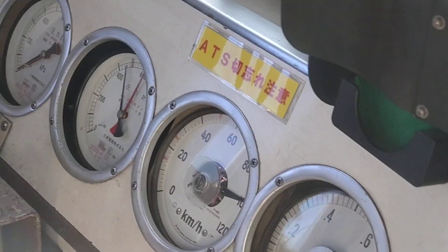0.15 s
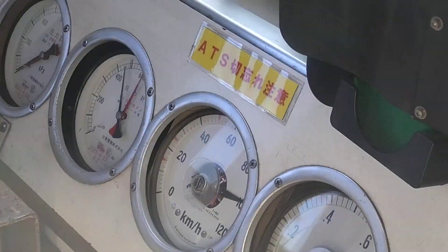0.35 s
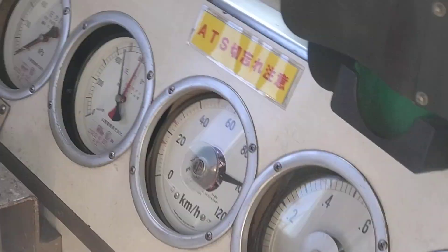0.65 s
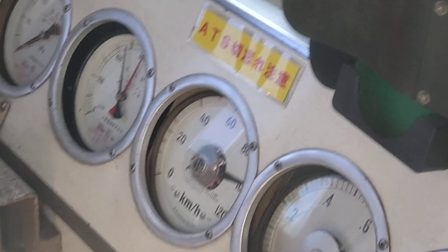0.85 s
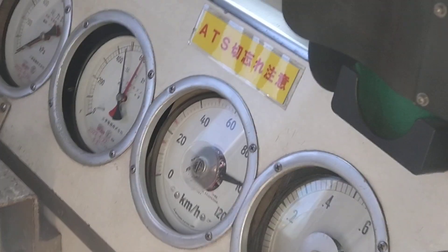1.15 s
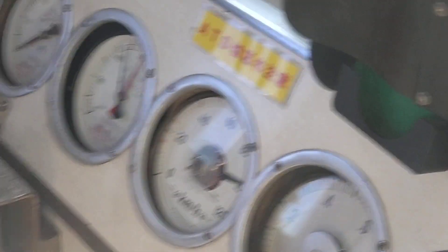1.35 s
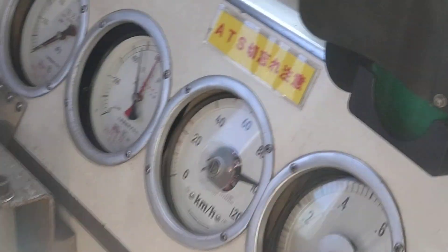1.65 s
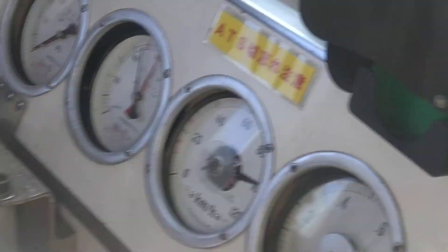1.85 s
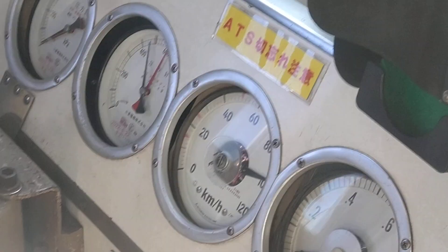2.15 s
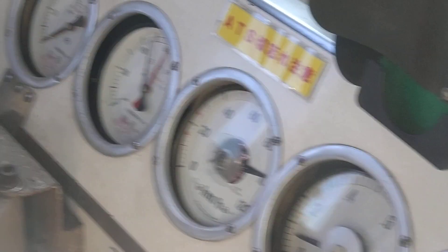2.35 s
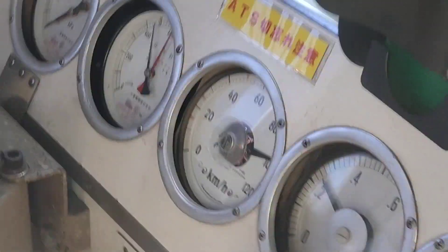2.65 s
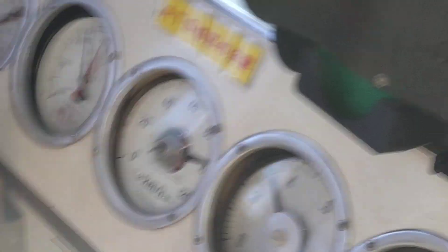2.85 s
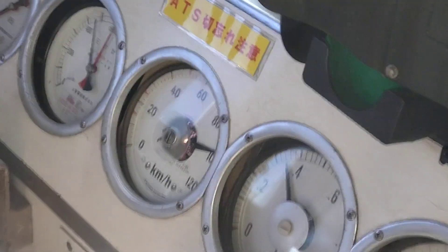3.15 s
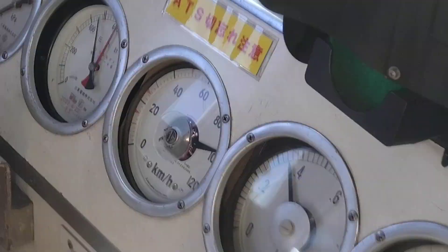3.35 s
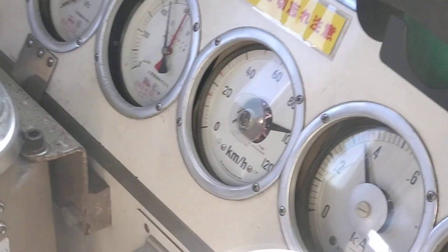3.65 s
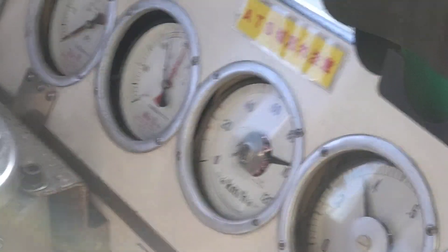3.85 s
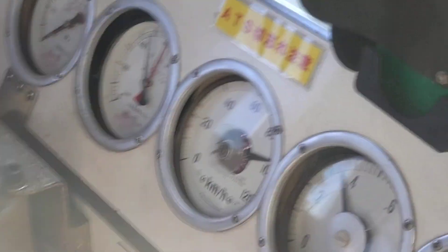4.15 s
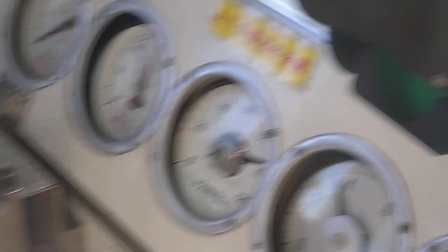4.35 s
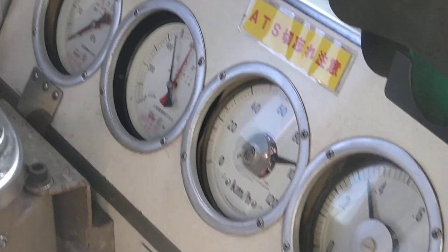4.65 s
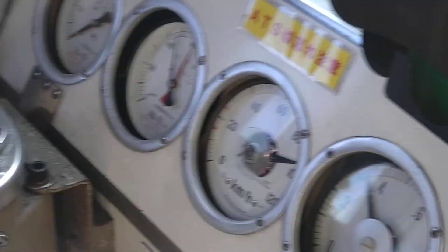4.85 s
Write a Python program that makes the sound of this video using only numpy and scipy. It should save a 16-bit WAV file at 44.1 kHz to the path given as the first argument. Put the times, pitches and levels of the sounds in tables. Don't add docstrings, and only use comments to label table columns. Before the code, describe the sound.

Inside a fast electric train cab, low wheel roar and a slowly sinking gear whine run under irregular track thumps, metal clanks and handling clicks.

```python
import sys
import numpy as np
from scipy import signal
from scipy.fft import rfft, irfft
from scipy.io import wavfile
from scipy.ndimage import uniform_filter1d

SR = 44100
rng = np.random.default_rng(int(sys.argv[2]) if len(sys.argv) > 2 else 0)


def file_out(sig):
    cols = np.atleast_2d(sig).T
    lim = np.clip(cols, -1, 1)
    pcm = np.round(lim * 32767).astype(np.int16)
    wavfile.write(sys.argv[1], SR, pcm)


def amplitude_ratio(level_db):
    exponent = np.asarray(level_db, float) / 20
    return 10 ** exponent


N = 221249


def evened(x):
    return x / np.sqrt(np.mean(x ** 2) + 1e-20)


def read(points, hz):
    f, value = np.transpose(points)
    return np.interp(np.log(hz + 1), np.log(f + 1), value)


def along(rows, t):
    s, *columns = np.transpose(rows)
    return [np.interp(t, s, c) for c in columns]


def swing(rows, t):
    db, = along(rows, t)
    return db - db.mean()


def add(mix, s, sound):
    part = mix[..., round(s * SR):][..., :sound.shape[-1]]
    part += sound[..., :part.shape[-1]]


def resonate(x, hz, width_hz):
    turn = np.exp(2j * np.pi * np.cumsum(hz * np.ones(x.shape[-1])) / SR)
    r = np.exp(-np.pi * width_hz / SR)
    return 2 * (turn * signal.lfilter([1 - r], [1, -r], x / turn)).real


def resonate_twice(x, hz, width_hz):
    return resonate(resonate(x, hz, width_hz), hz, width_hz)


def smooth_twice(x, size, axes=(-1, -1)):
    return uniform_filter1d(uniform_filter1d(x, size, axes[0]), size, axes[1])


def tinted(x, points, tilt_db=0):
    hz = np.fft.rfftfreq(x.shape[-1], 1 / SR)
    return irfft(rfft(x) * amplitude_ratio(read(points, hz) + tilt_db * np.log2((hz + 500) / 6000)), x.shape[-1])


def sides(pan_db):
    return amplitude_ratio(np.array([[pan_db / 2], [-pan_db / 2]]))


def fade_out(t):
    return np.cos(t / t[-1] * np.pi / 2)


# frequency in Hz, level in dB per Hz.
ROAR_COLOUR = [(13, -57), (22, -53), (46, -27), (62, -7), (76, -5), (168, -9.5), (246, -3.5), (545, -8.5),
               (801, -10.5), (1050, -14.5), (4150, -27.5), (4900, -33), (7590, -39.5), (8950, -46.5),
               (10600, -51), (13900, -46), (15500, -73)]
# frequency in Hz, width in Hz, lift in dB.
CAB_HOLLOWS = [(78, 49, 3), (244, 18, 7), (366.5, 27, 6.5), (480, 30, 2), (671.7, 29, 8), (826, 22, 2.5),
               (1376, 250, -2.5), (3830, 1400, -1), (9360, 330, 5), (15500, 900, 19)]
LAYER_SPLIT_HZ = (155, 880, 4160)
# frequency in Hz, likeness 0-1.
LIKENESS = [(30, .9995), (60, .998), (90, .996), (130, .945), (200, .955), (300, .982), (600, .9),
            (850, .75), (1150, .5), (1500, .45), (2200, .3), (4000, .35), (15000, .3)]
# frequency in Hz, level in dB.
BALANCE = [(20, 2), (60, -1.5), (300, -0.7), (700, 0), (1300, 4), (2400, 2), (4400, 2.5), (7500, -6),
           (8600, 17.5), (10200, 7), (11200, -2.5), (15000, 2.5)]
# frequency in Hz, phase in radians.
PORT_LEAD = [(300, 0), (850, .3), (1150, 1.5), (1500, 1.9), (2200, 1.5), (15000, 1.57)]
# time in seconds, level in dB.
BODY_SWAY = [(0, -26), (.42, -28), (.71, -18), (.91, -31), (1.05, -27.5), (1.6, -31), (1.77, -22.5),
             (1.98, -47), (2.25, -38), (2.6, -40.5), (2.74, -25.5), (3.05, -29.5), (3.56, -40.5),
             (3.8, -31), (3.97, -34.5), (4.44, -25.5), (4.76, -32), (5.02, -35)]
# time in seconds, level in dB.
ROUGHNESS = [(0, -11.5), (.4, -12.5), (.78, -12.5), (.95, -15.5), (1.2, -15.5), (1.34, -17.5), (1.87, -21),
             (1.98, -13.5), (2.15, -27.5), (2.25, -21.5), (2.6, -26), (2.91, -17.5), (3.08, -21),
             (3.48, -24.5), (4.18, -17.5), (4.44, -18.5), (4.8, -21), (5.02, -17)]
ROUGHNESS_SHARE = (0.87, 0.88, 0.65)


def rolling(patchy_db=1.9, flicker_db=0.6, bass_patchy=0.45):
    frames, hz = N // 256 + 5, np.fft.rfftfreq(1024, 1 / SR)
    t = np.arange(frames) * 256 / SR
    a, b, c, d, patches = rng.standard_normal((frames, 513, 5)).T
    patches = evened(smooth_twice(patches, 10, (0, 1)))
    flicker = evened(uniform_filter1d(rng.standard_normal(frames), 5))

    layers_db = [swing(BODY_SWAY, t)] + [share * swing(ROUGHNESS, t) for share in ROUGHNESS_SHARE]
    above = [np.ones(513)]
    above += [1 / (1 + (f / (hz + 1)) ** 6) for f in LAYER_SPLIT_HZ]
    above += [np.zeros(513)]
    swell_db = sum((above[k] - above[k + 1])[:, None] * db for k, db in enumerate(layers_db))
    colour_db = read(ROAR_COLOUR, hz)
    colour_db = colour_db + sum(db / (1 + (2 * (hz - f) / w) ** 2) for f, w, db in CAB_HOLLOWS)

    treble = above[2][:, None]
    patch_db = patchy_db * (bass_patchy + (1 - bass_patchy) * treble) * patches
    gain_db = colour_db[:, None] + swell_db + patch_db + flicker_db * flicker * treble
    half_lean_db = read(BALANCE, hz)[:, None] / 2

    same = read(LIKENESS, hz)[:, None]
    left = a + 1j * b
    right = same * left * np.exp(-1j * read(PORT_LEAD, hz))[:, None] + np.sqrt(1 - same ** 2) * (c + 1j * d)
    z = np.array([left * amplitude_ratio(gain_db + half_lean_db), right * amplitude_ratio(gain_db - half_lean_db)])
    return amplitude_ratio(-20) * evened(signal.istft(z, nperseg=1024, noverlap=768)[1][:, :N])


# time in seconds, frequency in Hz.
GEAR_MESH = [(0, 827), (1, 823), (2, 819), (2.5, 815), (3, 810), (3.5, 802), (4, 795), (4.5, 788),
             (5.02, 782)]
TONE_ORDERS = (1, .9755, 2, 1.951, 1.117, 3, 2.927, 1.038)
# time in seconds, near motor in dB, far motor in dB, second orders in dB.
TOOTH_LOAD = [(0, -37, -38, -46), (.3, -33, -36, -40), (.75, -35, -32, -41), (1.1, -41, -37, -43),
              (1.3, -38, -39, -49), (1.5, -36, -37, -44), (1.75, -37, -34, -43.5), (2.02, -37, -38, -42.5),
              (2.15, -46, -50, -57), (2.75, -38, -40, -55), (3, -35, -44, -51), (3.3, -40, -44, -50),
              (3.6, -41, -46, -49), (3.8, -36, -45, -48), (4.2, -33, -40, -52), (4.5, -35, -44, -52),
              (5.02, -35, -40, -50)]
FAR_SECOND_DB, THIRD_DB, WOBBLE_DB = -7, -8.5, .8
SIDE_DB, SIDE_FROM_S, SIDE_WAKE_DB = -58, 3.22, 14
STRAND_DB, STRAND_FROM_S = -36.5, 4.42


def gears(waver_hz=14.0, low_purity=.64, high_purity=.82):
    t = np.arange(N) / SR
    mesh_hz, = along(GEAR_MESH, t)
    near, far, second = along(TOOTH_LOAD, t)
    far_second = second + FAR_SECOND_DB
    side = SIDE_DB + SIDE_WAKE_DB / (1 + np.exp((SIDE_FROM_S - t) / 0.04))
    strand = STRAND_DB - 20 / (1 + np.exp((t - STRAND_FROM_S) / 0.023))
    levels_db = [near, far, second, far_second, side, second + THIRD_DB, far_second + THIRD_DB, strand]
    out = np.zeros((2, N))
    for multiple, db in zip(TONE_ORDERS, levels_db):
        hz = multiple * mesh_hz
        apart = np.clip(multiple - .8, 0, 1)
        purity = low_purity + (high_purity - low_purity) * apart
        turns = np.cumsum(hz) / SR + rng.random() + apart * rng.random((2, 1))
        tone = np.sqrt(2) * np.sin(2 * np.pi * turns)
        rough = (1 - apart) * rng.standard_normal(N) + apart * rng.standard_normal((2, N))
        fuzz = evened(resonate_twice(rough, hz, 2 * waver_hz))
        wobble = evened(smooth_twice(rng.standard_normal(N), 2500))
        out += amplitude_ratio(db + WOBBLE_DB * wobble) * (purity * tone + (1 - purity) * fuzz)
    return amplitude_ratio(6.3) * out


# start in seconds, peak in dB, floor ring in Hz, rebound in dB, rebound delay in seconds.
RAIL_JOINTS = [(1.935, -3.5, 288, -19, .03), (1.945, -2.5, 270, -3, 0.019), (1.974, -4.5, 330, -10, .014),
               (2.008, 4.5, 269.5, -2.5, .017), (2.196, 0.5, 273, -8, .013), (2.284, -5, 264.4, -1, 0.025),
               (2.878, -4, 228.7, -8.5, 0.037), (2.888, -2.5, 257, -11.5, .016),
               (2.92, -12, 216, -12, .015), (2.949, 2.5, 275.7, -8, 0.018), (2.98, -6.5, 269, -11, 0.021),
               (3.139, -5, 200, -2.5, .011), (3.171, -14, 286, -2, .015), (3.227, -6.5, 217, -10.5, .016)]
# start in seconds, peak in dB, floor ring in Hz, rebound in dB.
SWITCH_BLOWS = [(.195, -22, 293, -9), (.578, -13, 232, -3), (2.613, -21, 426, -18), (2.649, -15.5, 254, -5),
                (2.749, -21, 368, 6), (3.572, -20.5, 283, -5), (4.262, -4, 256.5, -3.5),
                (4.85, -20, 387, -21), (.008, -8.5, 260, -9), (.479, -3, 243, -9.5),
                (4.652, -9.5, 297, -10), (0.673, -15, 258, 1), (0.706, -11, 320, -11),
                (0.744, -6, 363, -28), (.801, -1, 286, -22), (.846, -2.5, 330, -20), (.946, -2.5, 283, -19),
                (.985, -4.5, 352, -23), (1.012, 2.5, 254, -8), (1.186, -0.5, 250.4, -3),
                (1.23, -5.5, 270, -3.5), (1.379, -7.5, 220, 3), (1.398, -4, 228, -11.5),
                (1.46, -5.5, 252.4, -5), (1.622, -11, 283, -27), (1.758, -13, 381, -17),
                (3.706, -14.5, 247, -18), (3.852, -10, 263, -36), (3.968, -6.5, 343, -13),
                (4.029, -6, 331, -24), (4.039, -6.5, 325, -10), (4.054, -3, 254, -1.5), (4.221, 1, 329, -7),
                (4.231, -2, 261, -19), (4.245, 1, 248, -7), (4.272, -9.5, 277, -14), (4.951, -7, 277, -7)]
# start in seconds, peak in dB, floor ring in Hz, rebound in dB.
STEEL_SLAPS = [(0.408, -9, 418, -18), (2.299, -32, 268, -10), (2.599, -31, 400, -20),
               (2.996, -50, 280, -12), (4.55, -11.5, 289, -6), (0.324, -16, 241, 7.5),
               (0.718, -0.5, 338, -4), (1.955, -13, 290, -5), (4.419, -46, 248, -11),
               (4.6383, -0.5, 264.4, -9), (4.666, -7.5, 353, -2.5), (4.69, -13, 312, -3.5),
               (4.713, -11, 310, -26), (4.927, -23.5, 314, -5)]
JOINT_RING, POINT_RING = 0.7, 0.49
JOINT_CRACK_DB, POINT_CRACK_DB, SLAP_CRACK_DB = -11, -12.5, 3
CRACK_FOLLOW = .5
REBOUND_S, REBOUND_HZ, SECOND_REBOUND_DB, REBOUND_CRACK_DB = .019, 283, -12.5, -5


def blows():
    first = [(*row, JOINT_CRACK_DB, JOINT_RING) for row in RAIL_JOINTS]
    first += [(*row, REBOUND_S, POINT_CRACK_DB, POINT_RING) for row in SWITCH_BLOWS]
    first += [(*row, REBOUND_S, SLAP_CRACK_DB, POINT_RING) for row in STEEL_SLAPS]
    out = []
    for s, db, hz, back_db, late_s, crack_db, ring_factor in first:
        crack_db = crack_db + CRACK_FOLLOW * db
        back_crack_db = crack_db + back_db + REBOUND_CRACK_DB
        out.append((s, db, hz, crack_db, ring_factor))
        out.append((s + late_s, db + back_db, REBOUND_HZ, back_crack_db, JOINT_RING))
        out.append((s + 2 * late_s, db + back_db + SECOND_REBOUND_DB, REBOUND_HZ,
                    back_crack_db + REBOUND_CRACK_DB, JOINT_RING))
    return out


# ratio to the ring, level in dB, t60 in seconds.
PANEL_MODES = [(0.975, 6, 0.13), (1.094, 4, 0.075), (1.44, -6, 0.19), (1.788, 3.5, 0.049),
               (0.657, -1, 0.034), (0.341, -9.5, 0.11)]


def joints():
    t, out = np.arange(6144) / SR, np.zeros((2, N))
    for s, db, hz, crack_db, ring_factor in blows():
        ring = np.zeros(len(t))
        for ratio, mode_db, t60 in PANEL_MODES:
            decay = amplitude_ratio(mode_db - 60 * t / (t60 * ring_factor))
            ring += decay * np.sin(2 * np.pi * (ratio * hz * t + 0.15 * rng.random()))
        ring *= (1 - np.exp(-t / 0.0046)) ** 2
        noise = rng.standard_normal(len(t)) + .5 * rng.standard_normal((2, len(t)))
        crack = evened(resonate(resonate(noise, 1290, 2500), 825, 300))
        crack *= amplitude_ratio(-60 * t / 0.21) * (1 - np.exp(-t / 0.0013))
        add(out, s - .004, amplitude_ratio(db - 3.5) * ring / abs(ring).max() + amplitude_ratio(crack_db - 20) * crack)
    return signal.sosfilt(signal.butter(2, 55, "high", fs=SR, output="sos"), out)


# start in seconds, peak in dB, left minus right in dB, rattle t60 in seconds.
FITTING_CLANKS = [(0.4875, -20, -5, 0.31), (0.9855, -31.5, 34, 0.36), (1.3, -20, 5.5, 0.9),
                  (1.465, -19, 3.5, 1), (1.96, -43, 0, 0.57), (2.017, -27, 6, 0.09), (2.105, -22, 1, 1),
                  (3.1043, -23, 7, 1), (4.04, -23, 10.5, 0.44), (4.229, -24.5, 19, 0.55),
                  (4.3, -31, 8, 0.075), (4.647, -36, -19, 0.21), (4.7084, -18, -5, 0.16),
                  (4.791, -21, 0, 0.43), (4.968, -23.5, 9, 0.38)]
# start in seconds, peak in dB, left minus right in dB, rattle t60 in seconds,
# brightness in dB an octave.
FITTING_KNOCKS = [(3.4328, -7.5, 4, .22, -.5), (3.4405, -11, 4, .15, -2), (3.4555, -13, 4, .2, -2),
                  (3.476, -18, 4, .4, -1), (3.6754, -18.5, 1, .35, -2.5), (3.695, -18, 1, .4, -1.5),
                  (4.552, -18, -3, .3, -6), (4.5654, -17, 4, .4, -6), (4.6385, -15.5, 2, .3, -.5),
                  (4.647, -14, 2, .3, -.5), (4.659, -12, 5, .3, -1), (4.668, -13, 3, .3, -1),
                  (4.69, -16, 2, .4, -.5), (4.7385, -17, 1, .3, -1.5)]
# frequency in Hz, level in dB per Hz.
SHEET_COLOUR = [(150, -75), (530, -33), (900, -12), (1500, -4), (2150, -4), (3100, -4), (3870, -4),
                (4570, -6), (5500, -11), (7400, -20), (9370, -23), (15000, -32)]
# frequency in Hz, width in Hz, level in dB.
SHEET_RINGS = [(3900, 280, 2), (2250, 600, -14), (4900, 350, -14)]
RING_FOLLOW = 1.1
DULL_FOLLOW = .2


def clanks():
    t, out = np.arange(12288) / SR, np.zeros((2, N))
    rows = [(*row, DULL_FOLLOW * (row[1] + 10)) for row in FITTING_CLANKS]
    for s, db, pan_db, t60, tilt_db in rows + FITTING_KNOCKS:
        grains = amplitude_ratio(1.2 * np.minimum(rng.exponential(1, len(t) // 64), 4)).repeat(64)
        spot = rng.uniform(.97, 1.04)
        rattle = evened(tinted(rng.standard_normal((2, len(t))) * grains, SHEET_COLOUR, tilt_db))
        rings = sum(amplitude_ratio(d) * evened(resonate_twice(rattle, f * spot, w)) for f, w, d in SHEET_RINGS)
        shape = amplitude_ratio(-60 * t / t60) + .8 * amplitude_ratio(-60 * t / .035)
        shape *= (1 - np.exp(-t / .0006)) * fade_out(t)
        add(out, s, amplitude_ratio(db - 11) * sides(pan_db) * (rattle + amplitude_ratio(RING_FOLLOW * db) * rings) * shape)
    return out


# start in seconds, peak in dB, left minus right in dB, brightness in dB an octave.
CASING_TICKS = [(0.196, -24.5, -25, -2.5), (0.497, -19.5, 3, 14), (1.1693, -19, 5, 0), (1.251, -32, -10, 7),
                (1.758, -28, 2, 5), (2.538, -31, -12, 1), (2.6517, -22, -1.5, 4), (2.829, -26.5, -8, 8),
                (2.927, -23.5, -3, 4), (3.0365, -14, 3, 2), (3.211, -27.5, 12, 9), (3.9688, -35, 1, -2),
                (4.0414, -30, 3, 3), (4.217, -22, -12, 10), (4.2504, -22, -13, 4.5),
                (4.3052, -21.5, -4, 16), (4.379, -21.5, -5, 6), (4.6366, -33, 21, -11)]
# start in seconds, peak in dB, left minus right in dB.
CASING_SNAPS = [
    (2.813, -17, -3),
    (2.8669, -10, -5),
    (2.929, -18, -1),
    (2.6532, -16, 2),
    (2.986, -19, 2),
    (3.2005, -20, 3),
    (3.311, -14, -3),
    (4.1945, -5, -1),
]
# start in seconds, peak in dB, left minus right in dB,
# brightness in dB an octave, t60 in seconds.
HAND_RUBS = [
    (.18, -24, 1, 3, 0.39),
    (3.95, -19.5, -2.5, -1, 0.98),
    (4.2, -22.5, 4, 3, 0.42),
    (4.27, -31, -4, 7, .5),
    (4.39, -23.5, -3, 6, .6),
]
# frequency in Hz, level in dB.
CASING_COLOUR = [(600, -76), (1500, 13.5), (2500, 4.5), (5000, -4.5), (6000, 1), (7500, -8), (9000, 0.5),
                 (10500, -11.5), (13000, -5.5), (15500, -23)]
TICK_T60_S, SNAP_T60_S, SNAP_TILT_DB = .11, .012, -1.5


def ticks():
    t, out = np.arange(8192) / SR, np.zeros((2, N))
    rows = [(*row, TICK_T60_S) for row in CASING_TICKS]
    rows += [(*row, SNAP_TILT_DB, SNAP_T60_S) for row in CASING_SNAPS]
    for s, db, pan_db, tilt_db, t60 in rows + HAND_RUBS:
        burst = evened(tinted(rng.standard_normal((2, len(t))), CASING_COLOUR, np.clip(tilt_db, -6, 8)))
        shape = amplitude_ratio(-60 * t / t60) * (1 - np.exp(-45 * t / t60)) * fade_out(t)
        add(out, s, amplitude_ratio(db - 9) * sides(pan_db) * burst * shape)
    return out


# start in seconds, length in seconds, frequency in Hz, level in dB.
FLOOR_HUMS = [(0.07, 0.075, 88, -22), (0.17, 0.17, 65, -26.5), (0.12, 0.15, 338, -23.5),
              (0.29, 0.33, 273, -25.5), (0.36, 0.12, 380, -27), (0.599, 0.13, 89, -19),
              (1.618, 0.19, 275, -26.5), (1.6, 0.32, 310, -27), (2.5, 0.13, 280, -26),
              (.08, 0.15, 430, -24), (.39, 0.055, 560, -24), (0.57, .07, 510, -24), (4.02, .2, 810, -25.5),
              (2.86, 0.2, 202, -21), (3.7, 0.041, 3420, -38), (0.704, 0.12, 590, -22),
              (0.96, 0.059, 700, -23), (3.799, 0.12, 275, -24), (4.005, 0.39, 300, -27)]
HUM_WIDTH_HZ, HUM_WIDTH_SHARE = 16, 0.041


def hums():
    t, out = np.arange(0, .8, 1 / SR), np.zeros(N)
    for s, length_s, hz, db in FLOOR_HUMS:
        width_hz = HUM_WIDTH_HZ + HUM_WIDTH_SHARE * hz
        note = evened(resonate_twice(rng.standard_normal(len(t)), hz, width_hz))
        swell = np.sqrt(np.sin(np.pi * np.clip(t / length_s, 0, 1)).clip(0))
        add(out, s, amplitude_ratio(db) * note * swell)
    return out


def scene():
    return rolling() + gears() + joints() + clanks() + ticks() + hums()


# frequency in Hz, level in dB.
THRESHOLD = [(300, -70), (900, -11.5), (1500, -5.5), (3000, -4), (5000, 0.5), (9000, -1), (13000, 2.5),
             (15000, 1.5)]
# start in seconds, end in seconds, loss in dB.
TREBLE_SHORT = [
    (0, 1.07, 3),
    (1.41, 1.52, 2),
    (1.75, 2.03, 7),
    (2.43, 3.13, 6),
    (3.377, 4.8, 18),
]
# frequency in Hz, share 0-1.
LOSS_SHARE = [(6300, 0.05), (7300, 1), (10300, 1), (11000, 0.4), (12300, 0.4), (13000, 0.3)]
SPARED_ATTACKS = [
    2.8669,
    3.311,
    3.4328,
    4.1945,
    4.6385,
]
SPARE_BEFORE_S, SPARE_AFTER_S = .03, .012


def thinned(x, depth_db=-30.0, uneven_db=4.5):
    frame = dict(window="cosine", nperseg=1536, noverlap=1024)
    hz, t, z = signal.stft(x, SR, **frame)
    power = uniform_filter1d(uniform_filter1d(abs(z) ** 2, size=3, axis=1), size=2, axis=2)
    line_db = 10 * np.log10(abs(power) + 1e-16)
    jumps = rng.standard_normal((len(hz) // 5 + 1, len(t) // 3 + 1)).repeat(5, 0).repeat(3, 1)
    gate_db = uniform_filter1d(line_db, size=41, axis=1) + read(THRESHOLD, hz)[:, None]
    gate_db = gate_db + uneven_db * jumps[:len(hz), :len(t)]

    lost_db = uniform_filter1d(sum(db * (t >= a) * (t < b) for a, b, db in TREBLE_SHORT) * 1., size=7)
    z[1] *= amplitude_ratio(-lost_db * read(LOSS_SHARE, hz)[:, None])
    gain_db = depth_db / np.exp(np.clip(line_db - gate_db, -30, 30))
    thin = signal.istft(z * amplitude_ratio(gain_db), SR, **frame)[1][:, :N]
    whole = signal.istft(z, SR, **frame)[1][:, :N]

    s = np.arange(N) / SR
    spared = sum((s > a - SPARE_BEFORE_S) & (s < a + SPARE_AFTER_S) for a in SPARED_ATTACKS) * 1.
    return thin + uniform_filter1d(spared, size=301) * (amplitude_ratio(-3.5) * whole - thin)


def band_limit(x):
    return signal.sosfilt(signal.butter(12, 15670, fs=SR, output="sos"), x)


def record(dry):
    mix = np.clip(thinned(dry), -.97, .97)
    return band_limit(mix)


dry = scene()
out = record(dry)
file_out(out)
```